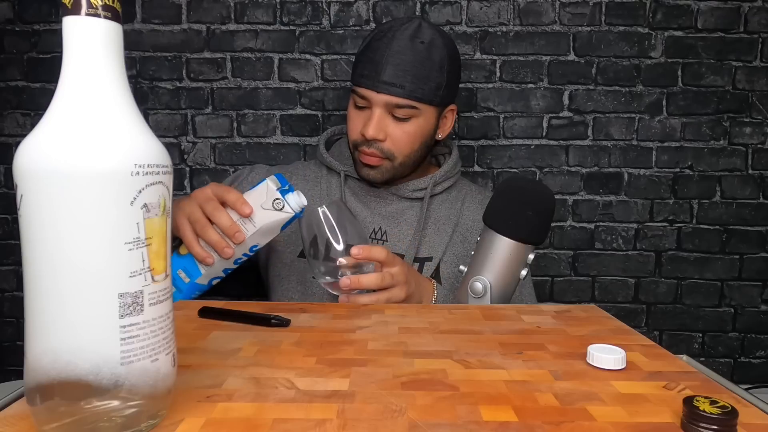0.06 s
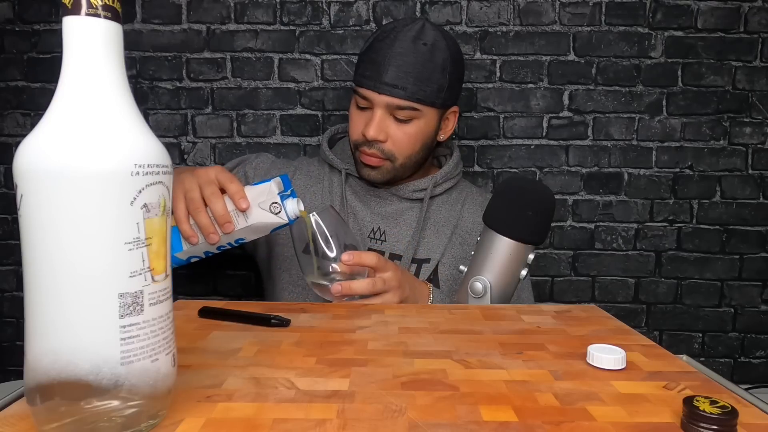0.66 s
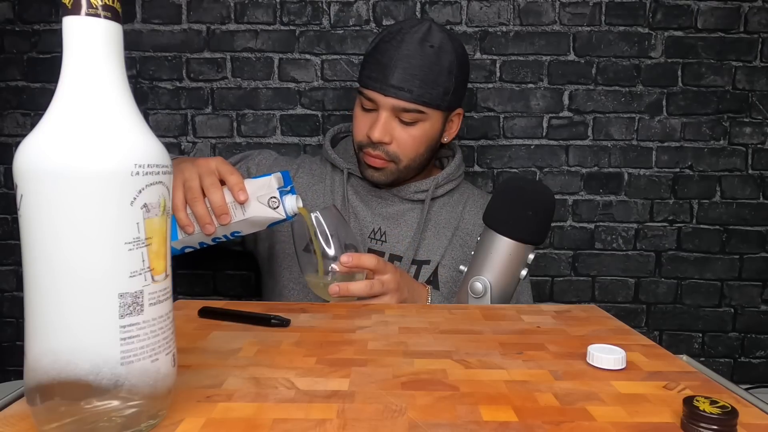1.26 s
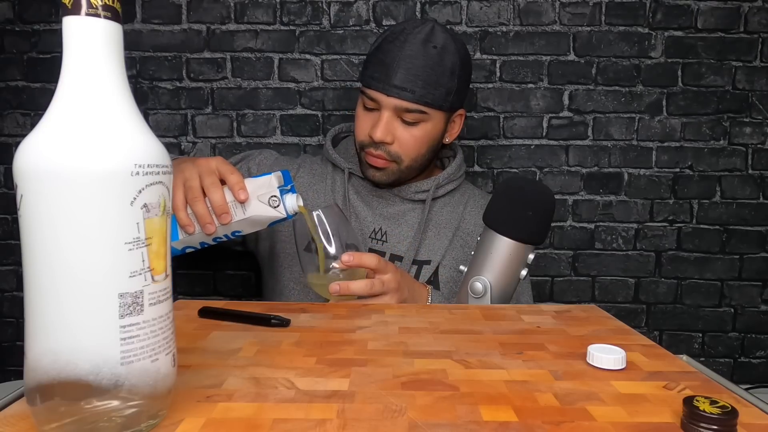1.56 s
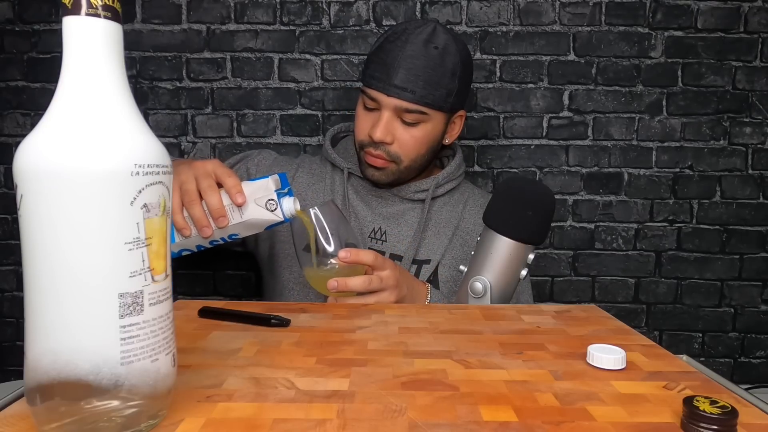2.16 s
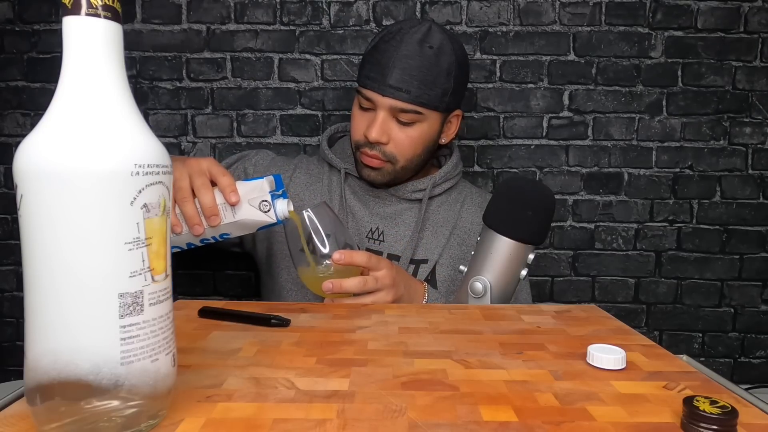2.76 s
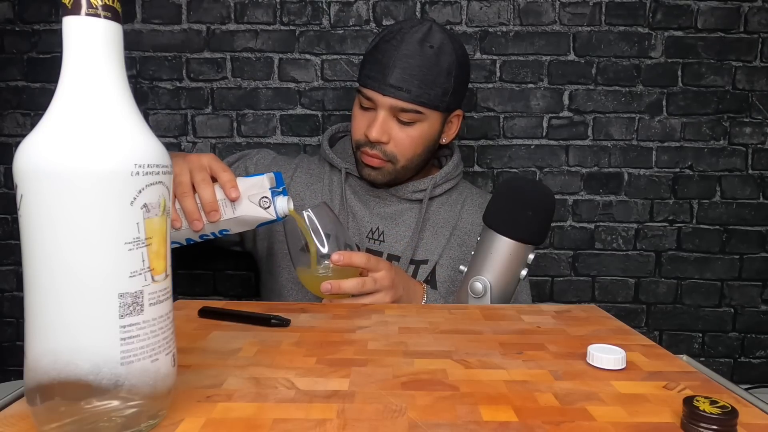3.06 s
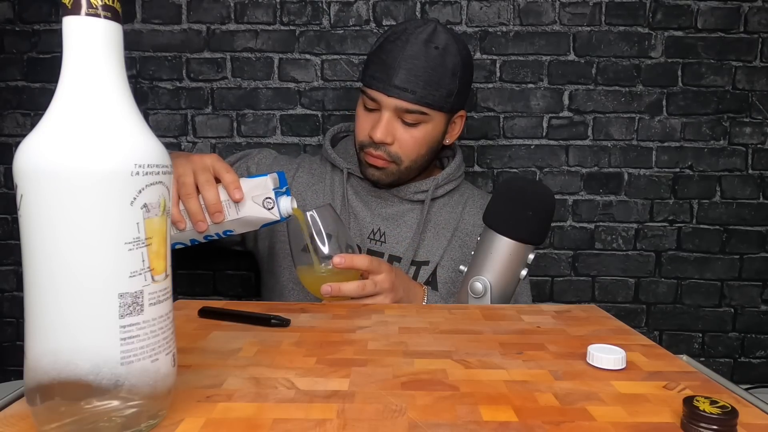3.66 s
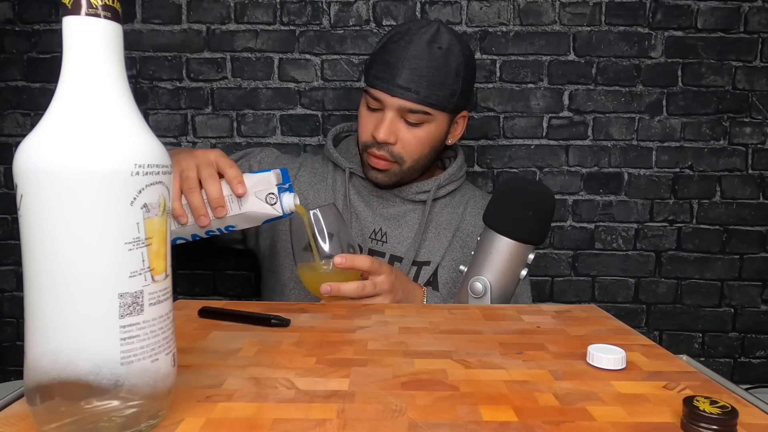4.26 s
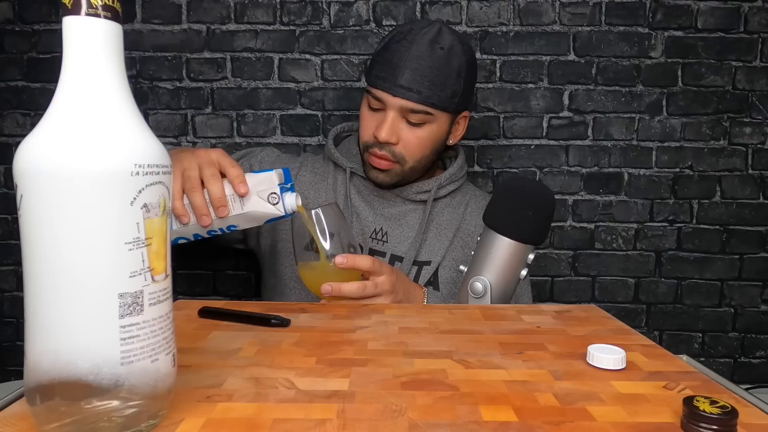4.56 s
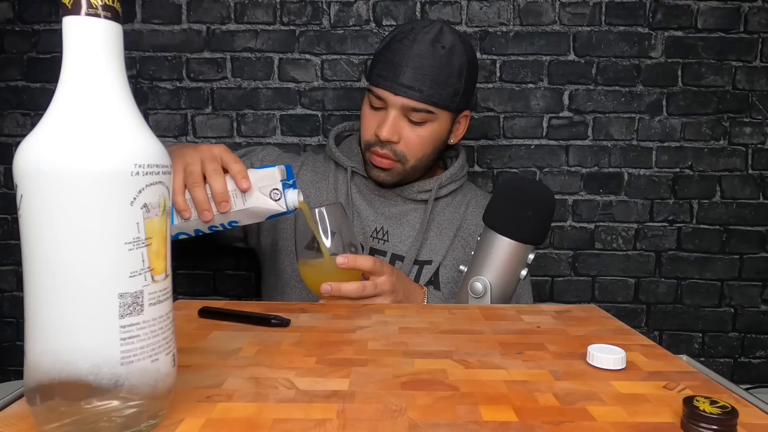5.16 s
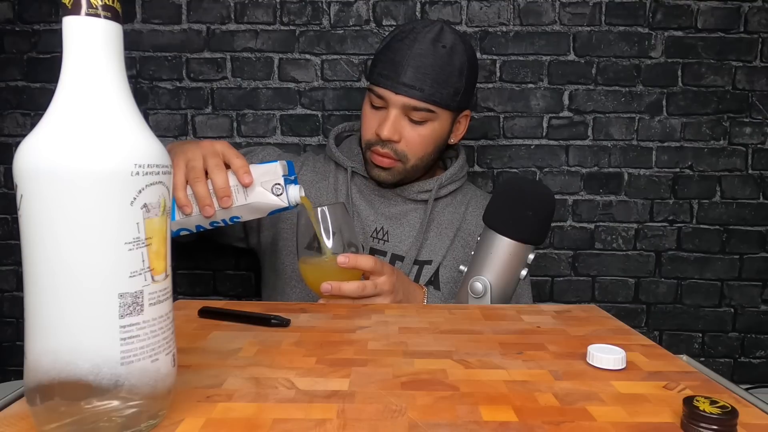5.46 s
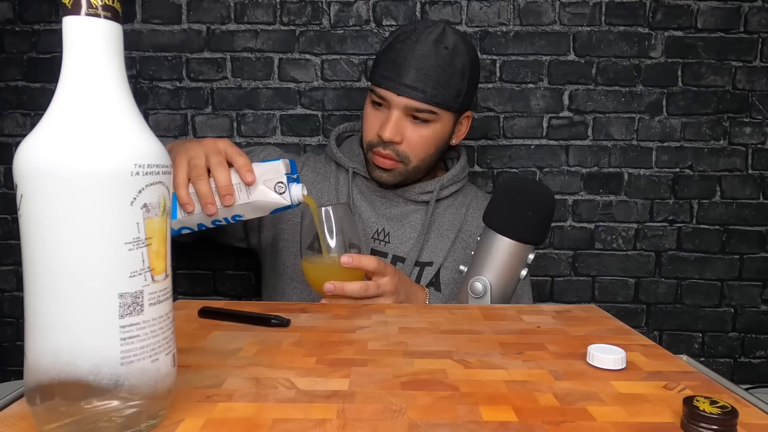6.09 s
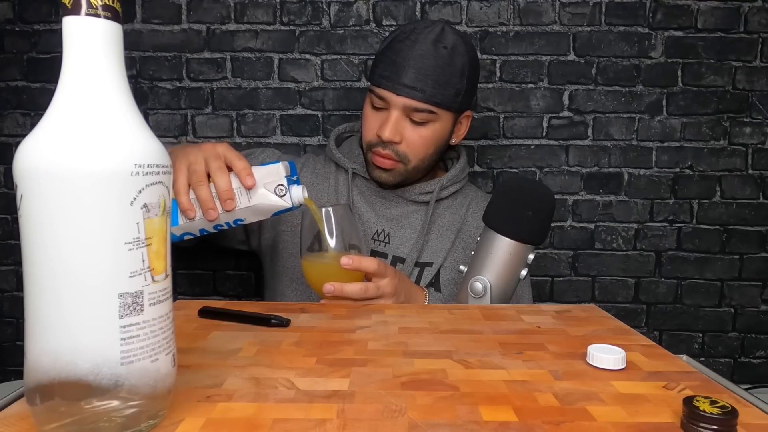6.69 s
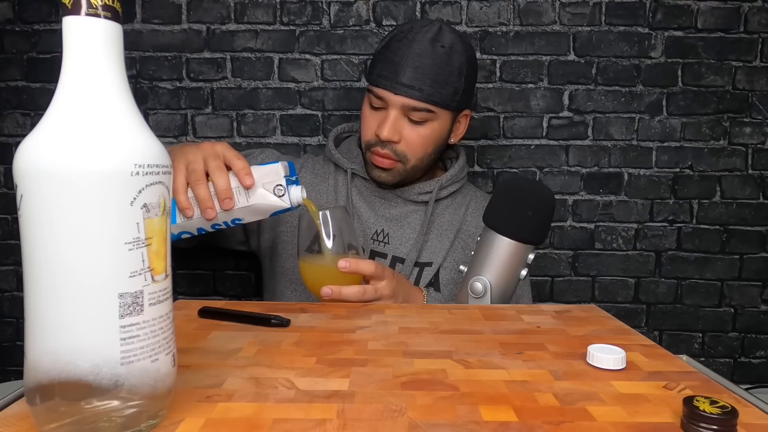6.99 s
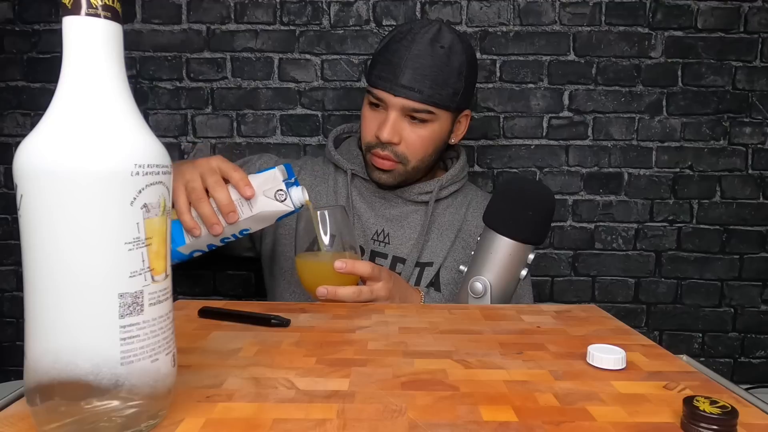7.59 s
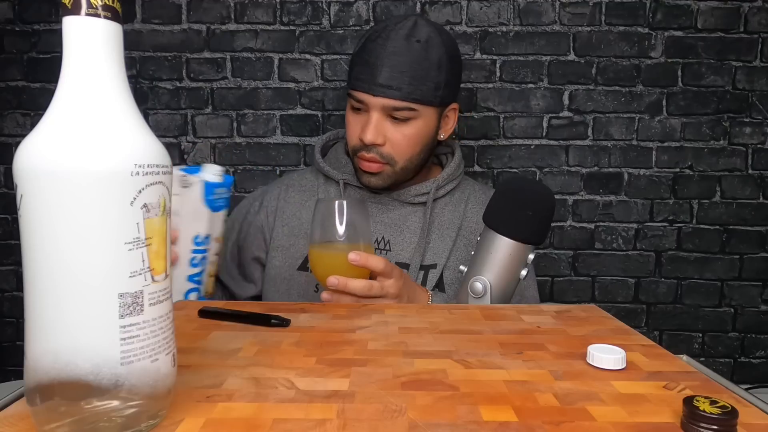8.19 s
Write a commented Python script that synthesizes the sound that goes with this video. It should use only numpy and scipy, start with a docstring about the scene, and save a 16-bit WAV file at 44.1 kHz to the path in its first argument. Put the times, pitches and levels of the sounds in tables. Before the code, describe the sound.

Juice pours from a carton into a glass in uneven, bubbling gushes, ending with a soft slosh and one drip.

```python
"""In a small quiet room, juice is poured from a carton into a stemmed glass close by.
The carton creaks and thuds in the hand, then the stream lands in gushes. Trapped air pulsates: swarms
of bubbles churn, single ones plip, big pockets glug. Spray ticks, and the air in the glass resonates at
a wavering pitch that drifts upward as it fills. Last, juice slops in the carton and a drip plinks."""
import sys
import numpy as np
from scipy import signal
from scipy.fft import rfft, irfft
from scipy.io import wavfile
from scipy.ndimage import uniform_filter1d

SR = 44100
rng = np.random.default_rng(int(sys.argv[2]) if len(sys.argv) > 2 else 0)


def store_wav(level_fs):
    """Save 16-bit WAV to argv[1]."""
    pcm = np.round(np.clip(np.atleast_2d(level_fs), -1, 1) * 32767)
    wavfile.write(sys.argv[1], SR, pcm.T.astype(np.int16))


N = 372081
POUR_START_S, POUR_END_S = .77, 7.15


def from_db(db):
    """Amplitude ratio of a level in decibels."""
    return 10 ** (np.asarray(db) / 20)


def unit_rms(x):
    """Normalisation to unit mean power."""
    return x / np.sqrt(np.mean(x ** 2) + 1e-20)


def in_time(points):
    """Linear interpolation of (time, value) points at every sample."""
    return np.interp(np.arange(N) / SR, *np.transpose(points))


def at_hz(points, hz):
    """Interpolation of a spectrum on a log-frequency axis."""
    f, db = np.transpose(points)
    return np.interp(np.log(np.maximum(hz, 1)), np.log(f), db)


def band(x, low_hz, high_hz, order=2):
    """Causal band-pass filtering."""
    sos = signal.butter(order, [low_hz, min(high_hz, .45 * SR)], "band", fs=SR, output="sos")
    return signal.sosfilt(sos, x + 1e-18)


def fade(t, t60):
    """Exponential decay, 60 dB in t60 seconds."""
    return np.exp(-np.log(1000) * t / t60)


def add(out, s, sound):
    """Superposition of a sound starting at s seconds."""
    i = int(np.clip(round(s * SR), 0, N - 1))
    out[i:i + len(sound)] += sound[:N - i]


def convolved(x, response):
    """Convolution with an impulse response scaled to unit energy."""
    return signal.fftconvolve(x, response / np.sqrt(np.sum(response ** 2)))[:N]


def struck(hits, modes):
    """Modal ringing: impulses (t/s, level/dB) excite damped sines (f/Hz, level/dB, t60/s)."""
    clicks, out = np.zeros((2, N))
    for s, db in hits:
        add(clicks, s, from_db([db]))
    for hz, db, t60 in modes:
        r, w = fade(1 / SR, t60), 2 * np.pi * hz / SR
        out += from_db(db) * signal.lfilter([0, np.sin(w)], [1, -2 * r * np.cos(w), r * r], clicks + 1e-18)
    return out


def ticks(rows, snap_db, body_db, snap_t60, body_t60):
    """Brief transients are broadband: a bright snap of noise over a lower, longer body."""
    snap, body = np.zeros((2, N))
    t = np.arange(SR // 20) / SR
    for (s, high_db, low_db), noise in zip(rows, rng.standard_normal((len(rows), 2, len(t)))):
        add(snap, s, from_db(high_db + snap_db) * noise[0] * fade(t, snap_t60))
        add(body, s, from_db(low_db + body_db) * noise[1] * fade(t, body_t60))
    return band(snap, 6400, 13130) + band(body, 760, 3700)


def room_tone(hum_hz=120):
    """Stationary background: broadband ventilation rumble and hiss, with a pure tone of mains hum."""
    # noise spectrum: f/Hz, relative density level/dB
    spectrum = [(12, -53), (20, -28), (44, -8), (130, 1.5), (168, -8.5), (222, -3), (301, -13), (357, -16),
                (873, -30), (1060, -31.5), (1220, -29), (1330, -30), (2820, -34.5), (4540, -36.5),
                (16000, -42.5)]
    hz = np.arange(N // 2 + 1) * SR / N
    air = irfft(rfft(rng.standard_normal(N)) * from_db(at_hz(spectrum, hz)), N)
    hum = np.sqrt(2) * np.sin(2 * np.pi * hum_hz * np.arange(N) / SR)
    return from_db(-55.88) * unit_rms(air) + from_db(-71) * hum


def carton_creaks():
    """The carton yields under the fingers in short broadband transients."""
    # creaks: t/s, relative snap level/dB, relative body level/dB
    creaks = [(0.011, -67, -56.5), (0.0368, -67, -53), (0.1335, -50, -59.5), (0.289, -51, -56),
              (0.297, -58, -58), (7.8111, -69.5, -54), (8.018, -78, -63), (8.042, -73, -60.5)]
    return ticks(creaks, snap_db=-3.5, body_db=14, snap_t60=.01, body_t60=.025)


def carton_bumps():
    """Heavy damping makes the low modes of the soft carton thud."""
    # bumps in the hand: t/s, relative level/dB
    bumps = [(0.035, -36.5), (1.775, -36), (2.242, -39.5), (2.289, -38), (2.447, -38.5), (2.478, -39.5),
             (3.34, -37), (3.498, -38.5), (3.7, -41), (4.066, -41.5), (4.443, -42.5), (4.825, -36),
             (5.839, -37), (6.076, -35)]
    thuds = struck(bumps, modes=[(115, -3, .014), (188.3, 13, .0089), (297, 10.5, .0046)])
    return from_db(-5) * band(thuds, 56, 1300)


def bubbles(rows, swell_cycles, glide, choke, splat):
    """Bubble resonance: trapped air pulsates, rises in pitch toward the surface and is choked there."""
    out, noise = np.zeros(N), rng.standard_normal(N)
    for s, hz, db, life_s in rows:
        t = np.arange(int(1.5 * life_s * SR) + 10) / SR
        age = t / life_s
        pitch = hz * (1 + glide * (np.minimum(age, 1) - .2))
        phase = 2 * np.pi * np.cumsum(pitch) / SR
        swell = 1 - np.exp(-t * hz / swell_cycles)
        shape = swell * fade(t, 3 * life_s) * np.exp(-(choke * age) ** 2)
        # the torn surface shakes the bubble anew on every cycle
        jolts = noise[int(s * SR):][:int(t[-1] * hz) + 2]
        shake = np.interp(t * hz, np.arange(len(jolts)), jolts) * np.exp(-2 * np.pi * age)
        add(out, s, from_db(db) * (shape / shape.max() * np.sin(phase) + splat * shake * np.cos(phase)))
    return out


def patter(per_s, spread_db, dull_hz):
    """Shot noise: droplets land at random as low-passed clicks of uneven size."""
    when, size, sign = rng.random((SR // 4, 3))[:int(per_s * N / SR)].T
    db = spread_db * np.minimum(-np.log(1 - size), 3)
    clicks = np.zeros(N)
    clicks[(when * N).astype(int)] = from_db(db) * np.sign(sign - .5)
    return signal.lfilter([1], [1, -np.exp(-2 * np.pi * dull_hz / SR)], clicks + 1e-18)


def level_out(x):
    """An even feed gives steady power: division by the running rms of a few hundredths of a second."""
    power = uniform_filter1d(uniform_filter1d(x ** 2, size=SR // 25), size=SR // 50)
    return x / np.sqrt(np.maximum(power, 0) + np.mean(x ** 2) / 100)


def swarm(low_hz, high_hz, cycles, spread_db, drops_db, count=1750):
    """Incoherent sum of many bubbles of one size class, among crackling drops."""
    # spectrum of the churn: f/Hz, relative density level/dB
    colour = [(470, -34.5), (800, -7), (1030, -10.5), (1680, 5), (1930, -20.5), (2350, -5.5), (2980, -25),
              (4060, -12.5), (4370, -27), (4710, -27.5), (5400, -38.5), (6110, -14), (7100, -12),
              (9210, -21.5), (15500, -26.5)]
    when, size, strength, life = rng.random((count, 4)).T
    onset_s = POUR_START_S + when * (POUR_END_S - POUR_START_S)
    hz = low_hz * (high_hz / low_hz) ** size
    # the 6 dB per octave stands for the greater number of small bubbles
    db = at_hz(colour, hz) + 20 * np.log10(hz / low_hz) + spread_db * strength ** 2
    life_s = cycles / hz * 2 ** (2 * life - 1)
    rings = bubbles(np.c_[onset_s, hz, db, life_s], swell_cycles=.8, glide=.06, choke=1.5, splat=.35)
    crackle = band(patter(per_s=600, spread_db=9.5, dull_hz=2000), low_hz, high_hz, order=3)
    return level_out(unit_rms(rings) + from_db(drops_db) * unit_rms(crackle))


def gush_envelopes():
    """Powers of incoherent sources add: gushes over a thin trickle, for each of three bubble sizes."""
    # gushes: t/s, length/s, relative level/dB of coarse bubbles, of fine bubbles, of spray
    gushes = [(0.833, 0.011, -79, -47, -57), (0.969, 0.028, -62.5, -54, -92.5),
              (1.053, 0.026, -60, -51.5, -77), (1.135, .012, -70, -59, -72),
              (1.158, 0.012, -54, -54, -51.5), (1.234, 0.063, -57.5, -47.5, -59.5),
              (1.387, 0.038, -51, -45, -68), (1.487, 0.055, -50, -47, -66), (1.651, 0.032, -63, -50, -75),
              (1.718, 0.2, -53.5, -51, -64.5), (1.951, .03, -66, -56, -52.5),
              (2.053, 0.079, -53.5, -53.5, -72), (2.198, .03, -80, -57, -64), (2.232, 0.11, -55, -55, -68),
              (2.438, 0.059, -56, -53.5, -70.5), (2.591, 0.031, -86, -63, -76),
              (2.762, 0.099, -65, -58, -74), (2.95, 0.059, -54.5, -43.5, -66),
              (3.109, 0.075, -55, -54.5, -77), (3.284, 0.1, -44.5, -48.5, -64.5),
              (3.448, 0.18, -66, -56.5, -69.5), (3.584, 0.15, -67.5, -59, -77),
              (3.815, 0.01, -70, -50.5, -81), (3.841, 0.084, -58, -60, -61), (3.979, 0.076, -54, -55, -77),
              (4.196, 0.077, -52.5, -53.5, -69), (4.335, 0.081, -52, -56, -75),
              (4.469, 0.05, -61.5, -83, -96), (4.585, 0.11, -48.5, -54, -76),
              (4.787, 0.059, -52.5, -54, -70), (4.937, 0.12, -53.5, -54, -65.5),
              (5.147, 0.11, -55.5, -56.5, -65), (5.338, 0.12, -57.5, -55.5, -67),
              (5.51, 0.042, -51, -62, -70), (5.645, 0.11, -52, -56.5, -68),
              (5.799, 0.084, -53, -54.5, -72.5), (5.917, 0.068, -63, -62, -76),
              (6.003, 0.062, -54, -62, -85), (6.069, 0.11, -77, -66, -75), (6.425, 0.095, -53, -57, -67),
              (6.548, 0.046, -57, -56.5, -68), (6.603, .18, -49, -59, -74), (6.787, 0.064, -65, -64, -83),
              (7.029, 0.014, -62.5, -68, -78)]
    attack_s, sag_db_per_s, release_db_per_s = .00618, 17, 348.5
    blobs_per_s, swing_db, trickle_db = 36, 13, -87.5
    power, t = np.zeros((3, N)), np.arange(SR // 2) / SR
    for (s, length, *levels_db), uneven in zip(gushes, rng.random((len(gushes), 24))):
        # the stream breaks into blobs; the level jumps as each lands
        landings = np.r_[0, np.cumsum(.5 + uneven)] / blobs_per_s
        age = t - landings[np.searchsorted(landings, t, side="right") - 1]
        pulse_db = swing_db * (.5 - np.minimum(age * blobs_per_s, 1))
        fall_db = sag_db_per_s * t + release_db_per_s * np.maximum(t - length, 0)
        shape = np.minimum(t / attack_s, 1) * from_db(pulse_db - fall_db)
        for layer, db in zip(power, levels_db):
            add(layer, s, (from_db(db) * shape) ** 2)
    power[:, int(POUR_START_S * SR):int(POUR_END_S * SR)] += from_db(trickle_db) ** 2
    return np.sqrt(power)


def glass_air(x, width_hz=60):
    """Cavity resonance: the air above the juice rings at a pitch that follows filling and tilt."""
    # resonance of the air: t/s, f/Hz
    cavity = [(1.2, 638), (2.2, 589), (3.3, 618), (3.97, 750), (4.09, 630), (4.22, 636), (4.4, 670),
              (4.64, 649), (4.85, 680), (5.02, 673), (5.33, 762), (5.55, 688), (5.8, 617), (6.0, 723),
              (6.18, 774), (6.45, 749), (6.7, 696), (7.0, 738)]
    carrier = np.exp(2j * np.pi * np.cumsum(in_time(cavity)) / SR)
    pole = np.exp(-np.pi * width_hz / SR)
    return 2 * np.real(carrier * signal.lfilter([1 - pole], [1, -pole], x / carrier))


def churn(cross_mode_hz=2550):
    """Forced resonance: coarse bubbles drive the air in the glass, fine ones its mode across the bowl."""
    coarse = from_db(-1.03) * swarm(760, 1900, cycles=15, spread_db=13, drops_db=-5)
    fine = from_db(-3) * swarm(1900, 4700, cycles=36, spread_db=14, drops_db=-9)
    spray = from_db(.7) * swarm(4700, 15000, cycles=56, spread_db=17, drops_db=-5)
    coarse, fine, spray = gush_envelopes() * [coarse, fine, spray]
    # strongest with a deep pool and a full stream: t/s, gain/dB
    coupling_db = in_time([(2.5, 4), (4.1, 19.8), (6.6, 21), (7.0, 11)])
    hollow = from_db(coupling_db) * glass_air(coarse)
    across = from_db(-4) * band(fine, .9 * cross_mode_hz, 1.1 * cross_mode_hz, order=1)
    return coarse + fine + spray + hollow + across


def bowl(x, scatter_db, t60):
    """Multiple reflection of short waves between the walls of the glass smears each click."""
    t = np.arange(SR // 25) / SR
    scatter = rng.standard_normal(len(t)) * fade(t, t60) * np.minimum(t / .006, 1)
    return x + from_db(scatter_db) * convolved(x, band(scatter, 1400, 10000))


def spatter():
    """Impulsive sources: films burst and drops hit the glass, each with a wet tick."""
    # bursts and impacts: t/s, relative snap level/dB, relative body level/dB
    impacts = [(0.836, -45, -26), (1.1667, -32, -26), (1.2316, -43, -40), (1.362, -50, -37),
               (1.4246, -42, -24.5), (1.5545, -37, -61), (1.729, -39, -29.5), (1.7734, -40, -34),
               (1.856, -35, -26), (1.963, -33, -19.5), (2.124, -63, -34.5), (2.287, -41, -35),
               (2.6514, -47, -41), (2.818, -51, -36), (3.0255, -34, -23), (3.3795, -42, -60),
               (3.6316, -45.5, -35.5), (3.8422, -55, -40), (3.918, -38, -34), (4.1024, -31, -27.5),
               (4.25, -36, -52), (4.412, -43, -63), (4.56, -45, -36), (4.7461, -59, -33),
               (4.8296, -41, -51), (4.865, -38, -34), (4.9567, -48, -28), (5.125, -39, -46),
               (5.2402, -43, -40), (5.692, -46, -33), (5.7453, -35.5, -56), (5.8701, -46, -46),
               (6.067, -48, -39), (6.1589, -46, -59), (6.4711, -38, -31), (6.5167, -23.5, -31.5),
               (6.604, -49, -36), (6.6886, -35, -36), (6.749, -33, -36), (6.81, -34.5, -51),
               (6.8528, -37.5, -58), (7.037, -49, -63), (7.251, -76, -45), (7.5152, -67, -43.5),
               (7.544, -68, -48.5)]
    return ticks(impacts, snap_db=-5.5, body_db=-2.5, snap_t60=.017, body_t60=.041)


def plips():
    """Damping of single bubbles: the smaller the bubble and the shallower the pool, the shorter it rings."""
    # bubbles heard above the churn: t/s, f/Hz, relative level/dB
    singles = [(0.837, 1165, -39), (0.8385, 2420, -34), (0.9714, 3330, -40.5), (1.0029, 3610, -40.5),
               (1.1667, 1010, -33.5), (1.166, 2170, -31), (1.1668, 7400, -31), (1.21, 1600, -40.5),
               (1.2327, 5676, -36.5), (1.2318, 2500, -34.5), (1.2822, 1124, -38), (1.3132, 2500, -39.5),
               (1.3622, 1330, -32), (1.4876, 2500, -37.5), (1.5176, 4060, -35), (1.6943, 3500, -37),
               (1.7232, 2180, -41), (1.856, 1480, -32.5), (1.8685, 2210, -37.5), (2.0852, 2200, -40),
               (2.1246, 4130, -39), (2.296, 1610, -39), (2.4981, 1585, -44.5), (2.6086, 3760, -48),
               (2.819, 1223, -36), (2.9535, 2220, -42.5), (2.9725, 2680, -40.5), (2.9993, 2270, -34.5),
               (3.0264, 2240, -36), (3.028, 11360, -41.5), (3.177, 1600, -45.5), (3.2896, 1470, -44),
               (3.349, 2230, -38.5), (3.3789, 8630, -45), (3.3969, 2120, -35), (3.457, 4280, -46),
               (3.5004, 2730, -41), (3.573, 3800, -39.5), (3.677, 5920, -45), (3.8441, 1140, -36.5),
               (3.8946, 1640, -28), (3.9242, 1426, -31), (4.1029, 9520, -41), (4.2446, 1080, -37.5),
               (4.2543, 12400, -49), (4.3447, 2340, -39.5), (4.3742, 2250, -37), (4.435, 2340, -40),
               (4.4952, 2450, -36), (4.5266, 2380, -40.5), (4.6442, 1600, -37), (4.8292, 9130, -43.5),
               (4.8668, 1700, -32.5), (4.9476, 2710, -38.5), (4.9494, 6340, -38), (4.961, 4720, -35),
               (5.149, 2420, -38.5), (5.1701, 2330, -37), (5.241, 1287, -32.5), (5.4416, 2620, -40),
               (5.5187, 1160, -37.5), (5.5566, 2460, -37.5), (5.7366, 1510, -37.5), (6.0187, 1405, -40),
               (6.4781, 1470, -36), (6.5134, 963, -34), (6.5162, 9500, -36), (6.605, 14700, -48),
               (6.804, 3040, -45.5), (6.8707, 1280, -49), (6.921, 1780, -53.5), (7.011, 1500, -49),
               (7.253, 3780, -56), (7.518, 2350, -46.5), (7.5468, 2210, -56)]
    # longer ringing as the pool deepens: t/s, share of full life
    life_share = [(1.1, 0.46), (2.9, 0.65)]
    s, hz, db = np.transpose(singles)
    full_life_s = .036 * (1000 / hz) ** .55
    life_s = full_life_s * np.interp(s, *np.transpose(life_share))
    return from_db(3) * bubbles(np.c_[s, hz, db, life_s], swell_cycles=.45, glide=.065, choke=2.3, splat=.3)


def glugs():
    """Resonant frequency falls as a bubble's radius grows, so big air pockets ring low."""
    # air pockets: t/s, f/Hz, relative level/dB, life/s
    pockets = [(1.2664, 581.4, -21.5, 0.076), (1.4246, 607, -15, 0.023), (1.8559, 763, -30, 0.031),
               (1.9652, 615, -9.5, 0.029), (3.3977, 766, -35.5, 0.042), (4.2076, 664, -39, 0.026),
               (4.388, 715, -43.5, 0.09), (4.6477, 632, -38.5, 0.039), (4.8022, 703, -23.5, 0.037),
               (4.8667, 696, -36.5, 0.034), (4.9849, 689, -26, 0.039), (5.031, 724, -36.5, 0.058),
               (5.2415, 695, -34.5, 0.038), (5.6682, 693, -29.5, 0.028), (5.7259, 820, -36.5, 0.021),
               (5.8711, 843, -34.5, 0.022), (6.4455, 774, -37.5, 0.043), (6.5002, 727, -31.5, 0.069),
               (6.6474, 695, -33.5, 0.037), (6.6875, 904, -35, 0.029), (6.7492, 886, -27.5, 0.012)]
    return from_db(-1) * bubbles(pockets, swell_cycles=.7, glide=.03, choke=1.9, splat=.05)


def carton_slops():
    """Impact excitation: juice falls back as the carton is tipped upright and sets its modes ringing."""
    # slops: t/s, relative level/dB
    slops = [(7.812, -40.5), (7.829, -43), (8.016, -48)]
    # modes of the carton: f/Hz, relative level/dB, t60/s
    modes = [(275, 3, 0.27), (331, -7, .05), (537, -9, 0.029), (1100, -27, 0.045)]
    return struck(slops, modes)


def last_drip():
    """Free decay: one drip excites a few short-lived partials, which scatter in the bowl."""
    # partials of the plink: f/Hz, relative level/dB, t60/s
    partials = [(850, -19, 0.07), (1306, -23.5, 0.028), (2580, -40, 0.019), (2940, 2.5, 0.05),
                (3460, -7, 0.013), (3885, -7, 0.015), (9500, -16.5, 0.011)]
    return bowl(struck([(7.9468, -31)], partials), scatter_db=-11, t60=.025)


def room(x, wet_db, t60, treble_t60):
    """Reverberation: early reflections, then a faint diffuse tail whose treble dies first."""
    # reflections from table, hands and carton: delay/s, amplitude ratio
    echoes = [(.0017, 0.078), (.0033, 0.031), (.0049, 0.042), (.0074, -.1), (.0108, -.09)]
    near, t = x.copy(), np.arange(SR // 2) / SR
    for delay, gain in echoes:
        add(near, delay, gain * x)
    noise = rng.standard_normal((2, len(t)))
    tail = band(noise[0], 100, 3000) * fade(t, t60) + band(noise[1], 2800, 12170) * fade(t, treble_t60)
    onset = np.clip((t - .006) / .0028, 0, 1)
    return near + from_db(wet_db) * convolved(x, tail * onset)


def scene():
    """Superposition: the pour, coloured by the glass, joins the carton and the drip in the room."""
    juice = bowl(glugs() + plips() + spatter() + churn(), scatter_db=-9, t60=.007)
    juice = juice + from_db(2.5) * glass_air(juice)
    carton = carton_creaks() + carton_bumps() + carton_slops()
    in_room = room(juice + carton + last_drip(), wet_db=-18, t60=.32, treble_t60=.23)
    return (in_room + room_tone())[None]


def record(dry, cutoff_hz=16100):
    """Band limiting: a steep low-pass removes the highest treble."""
    return signal.sosfilt(signal.ellip(10, .1, 80, cutoff_hz, fs=SR, output="sos"), dry)


dry = scene()
out = record(dry)
store_wav(out)
```